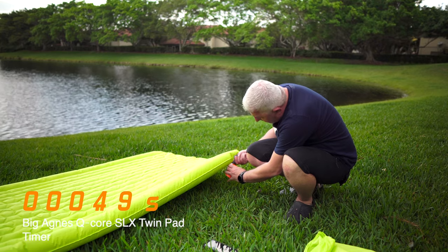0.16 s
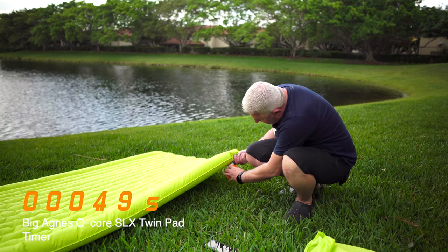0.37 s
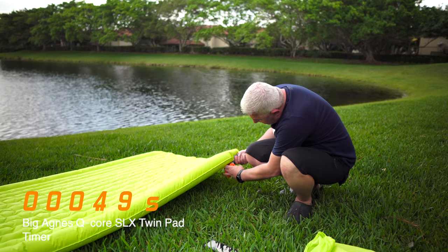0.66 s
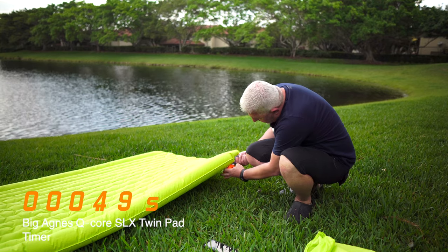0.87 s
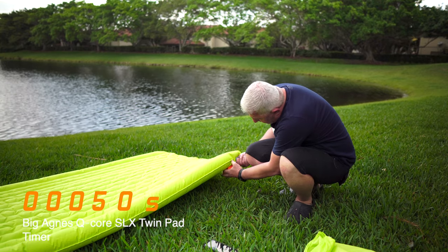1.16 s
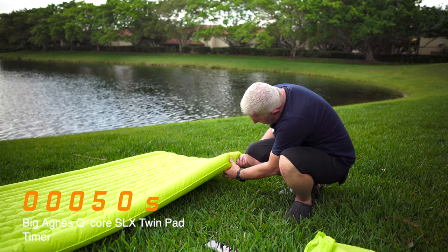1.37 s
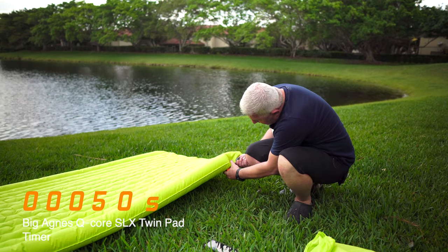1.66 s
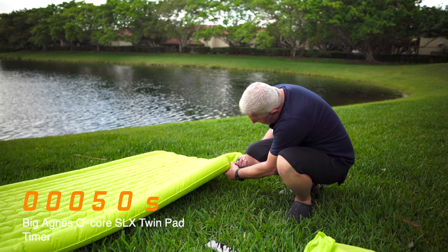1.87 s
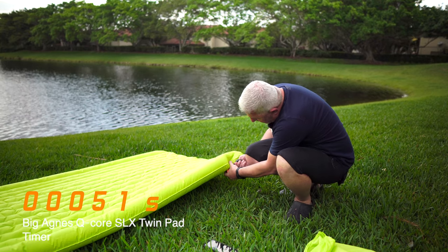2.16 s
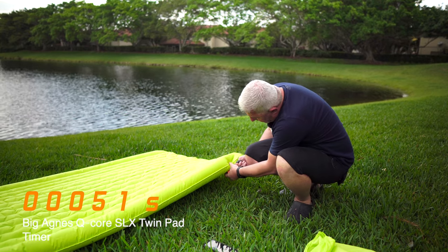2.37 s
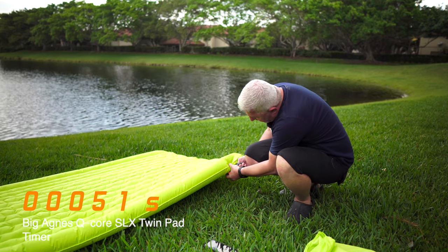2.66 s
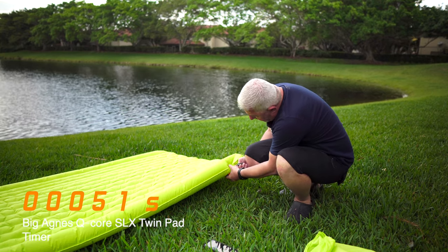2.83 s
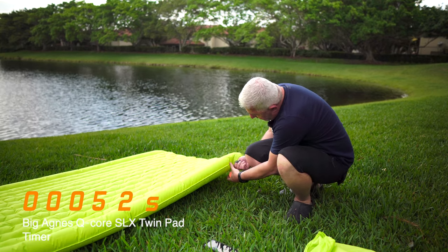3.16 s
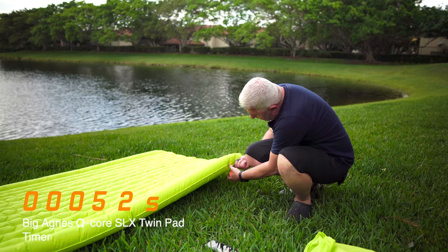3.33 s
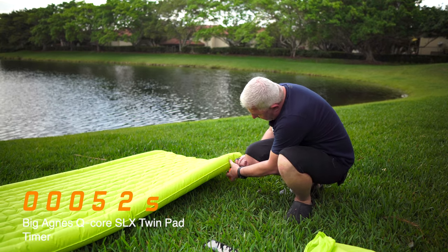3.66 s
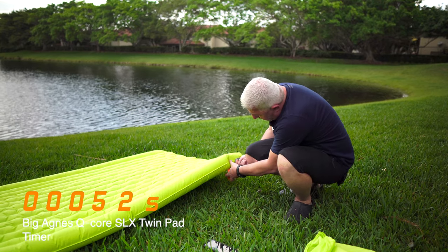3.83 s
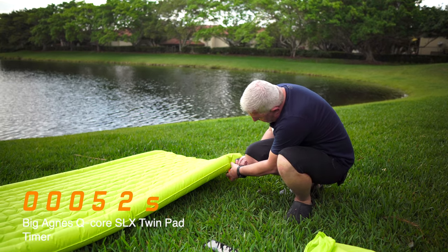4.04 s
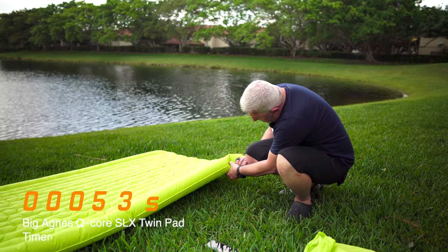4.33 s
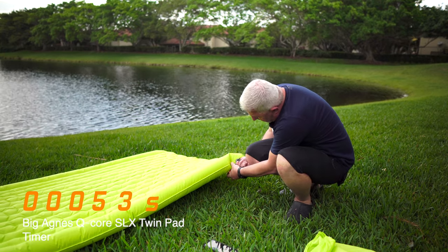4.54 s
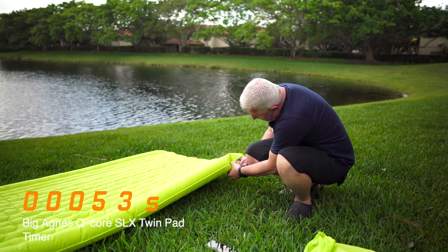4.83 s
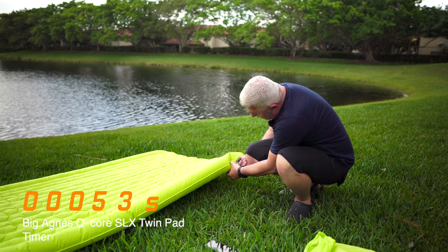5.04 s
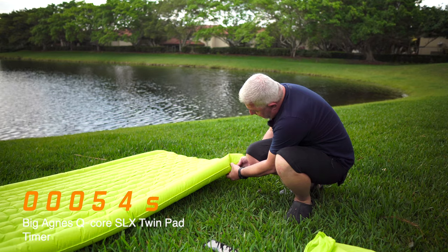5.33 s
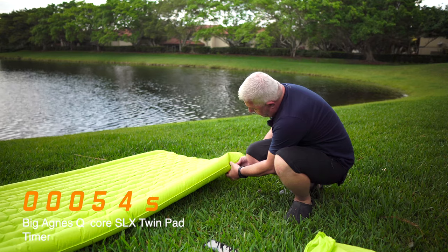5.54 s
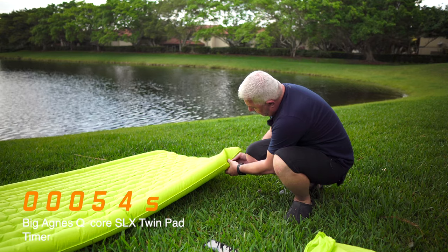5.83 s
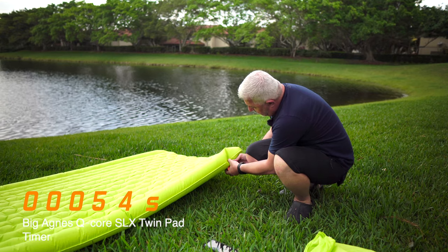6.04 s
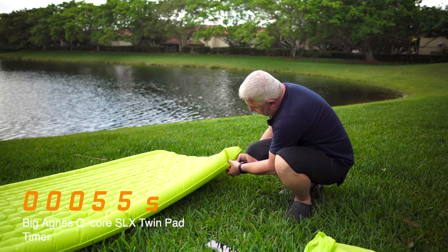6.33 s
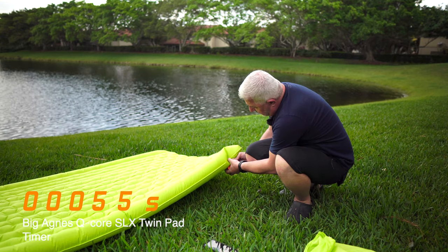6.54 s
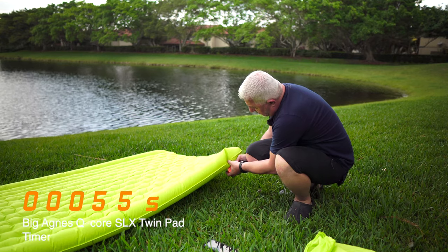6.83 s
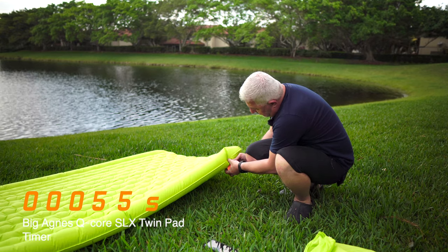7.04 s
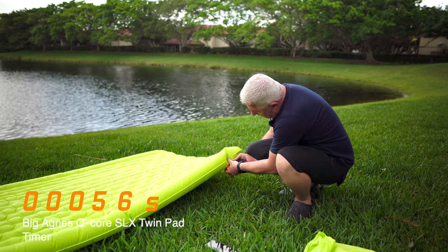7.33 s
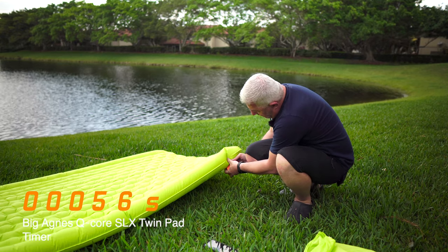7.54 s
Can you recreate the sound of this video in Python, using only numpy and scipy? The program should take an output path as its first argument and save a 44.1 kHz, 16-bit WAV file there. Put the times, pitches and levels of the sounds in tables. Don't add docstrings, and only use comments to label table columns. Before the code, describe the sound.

Close, high-pitched whine and rushing air of a handheld pump filling a mattress, its pitch wobbling, with handling clacks and late valve whistles.

```python
import sys
import numpy as np
from scipy import signal
from scipy.fft import rfft, irfft, next_fast_len
from scipy.io import wavfile
from scipy.ndimage import uniform_filter1d

SR = 44100
rng = np.random.default_rng(int(sys.argv[2]) if len(sys.argv) > 2 else 0)


def output_pcm(signal):
    pcm = np.clip(np.atleast_2d(signal).T, -1, 1) * 32767
    wavfile.write(sys.argv[1], SR, np.round(pcm).astype(np.int16))


def ratio(d):
    e = np.asarray(d, float) / 20
    return 10 ** e


N = 339129
T = np.arange(N) / SR
SLOW = T[::32]
HZ = np.fft.rfftfreq(next_fast_len(N), 1 / SR) + 1e-3
OCTAVE = np.log2(HZ)

# (time [s], wind and lawn level [dB], shaft unbalance level [dB])
LOW_LEVELS = [(0, -37.5, -39), (.55, -33.5, -38.5), (1.09, -36.5, -49), (1.3, -34.5, -48),
              (2.05, -38.5, -43), (2.33, -35, -53), (2.42, -36, -28.5), (2.8, -39, -37), (3.1, -38.5, -57),
              (4.2, -38, -38.5), (5.2, -38.5, -43.5), (5.5, -38.5, -74), (6.2, -36.5, -54),
              (7.05, -43.5, -76), (7.69, -40, -70)]


def columns(table, at=T):
    s, *curves = np.transpose(table)
    return [np.interp(at, s, curve) for curve in curves]


def unit(x):
    return x / np.sqrt(np.mean(x ** 2))


def fine(x):
    return np.interp(T, SLOW, x)


def walk(rate):
    hold = max(int(len(SLOW) / T[-1] / rate), 1)
    held = np.repeat(rng.standard_normal(1200), hold)[:len(SLOW)]
    slewed = uniform_filter1d(np.resize(held, len(SLOW)), hold)
    return unit(uniform_filter1d(slewed, hold))


def bump(s, rise, fall):
    away = (SLOW - s) / np.where(SLOW < s, rise, fall)
    return (1 + np.cos(np.pi * np.clip(away, -1, 1))) / 2


def gate(at, start, end, move_s):
    return np.clip(np.minimum(at - start, end - at) / move_s + 0.5, 0, 1)


def tone(hz):
    return 2 * np.pi * np.cumsum(hz) / SR


def colour(points):
    hz, db = np.transpose(points)
    return ratio(np.interp(np.log(HZ), np.log(hz), db))


def bands(gain, lo, hi, per_octave):
    size = next_fast_len(N)
    spectrum = rfft(rng.standard_normal(size)) * gain
    for hz in lo * 2 ** np.arange(0, np.log2(hi / lo), 1 / per_octave):
        away = np.clip((OCTAVE - np.log2(hz)) * per_octave, -1, 1)
        yield hz, irfft(spectrum * (1 + np.cos(away * np.pi)) / 2, size)[:N]


def blade_phase():
    # (time [s], frequency [Hz])
    blade_rate = [(0, 2954), (.955, 2961), (1.1, 3116), (2.31, 3109), (2.86, 3178), (3.25, 3190),
                  (3.33, 2960), (4.126, 3000), (4.33, 3104), (6.48, 3153), (6.56, 3390), (6.66, 3460),
                  (6.77, 3400), (6.89, 3280), (7.079, 3320), (7.259, 3423), (7.49, 3440), (7.66, 3480)]
    # (peak time [s], rise [s], fall [s], shift [Hz])
    pinches = [(.165, 0.15, 0.14, -17.5), (.46, .13, .11, -48.5), (1.03, 0.0602, .07, 25),
               (2.137, 0.17, 0.24, 134), (2.96, 0.14, .11, 182), (3.15, 0.084, 0.11, -13),
               (3.372, 0.037, 0.051, -28), (3.524, 0.096, 0.12, -42.5), (3.785, .17, 0.12, 155.5),
               (4.525, 0.16, 0.15, 135), (5.612, 0.16, 0.1, -79.5), (5.945, 0.13, 0.11, 133)]
    hz = columns(blade_rate, SLOW)[0]
    hz = hz + sum(shift * bump(s, rise, fall) for s, rise, fall, shift in pinches)
    hz = uniform_filter1d(hz, size=40)
    return tone(fine(hz * (1 + 0.00087 * walk(60))))


def blade_whine(phase):
    # (time [s], level [dB])
    grip = [(0, -22.5), (.3, -32), (.95, -31), (1.1, -31.5), (2.0, -31.5), (2.55, -32), (2.85, -48.5),
            (3.2, -46.5), (3.45, -34.5), (4.4, -35), (5.28, -36.5), (5.36, -22.5), (5.65, -23.5),
            (5.93, -31.5), (6.29, -24), (6.6, -38), (7.24, -35.5), (7.69, -33.5)]
    # (time [s], level [dB])
    intake_aim = [(0, -32), (.12, -17.5), (.36, -17.5), (.72, -27.5), (1.15, -33), (1.99, -34.5),
                  (2.59, -34), (2.87, -48), (3.23, -39), (3.3, -20.5), (3.6, -32.5), (4.39, -30.5),
                  (4.6, -36.5), (5.34, -34), (6.26, -31.5), (6.6, -38.5), (7.12, -39), (7.69, -46)]
    # level against the mean aim [dB], and share of the change of aim
    overtone_db, aim_share = [-0.5, -6.5, -21, -22.5], [1.0, 0.88, 0.32, 0.2]
    # (time [s], half length [s], gain [dB])
    shade_low = [(.41, .1, 7), (.485, 0.051, -13), (.78, 0.048, 6), (0.98, .03, -23), (2.162, 0.15, -8),
                 (2.895, .04, 10), (2.955, 0.054, 10), (3.271, 0.07, 20), (3.582, 0.14, -8),
                 (3.94, 0.044, -12), (4.146, 0.15, -3), (4.43, 0.025, -14), (4.49, 0.12, -5),
                 (4.572, 0.04, -16), (5.56, 0.021, -16), (6.675, 0.075, 6.5), (6.76, 0.037, 7),
                 (6.82, 0.05, -7), (7.515, 0.19, -6.5), (3.337, .05, 6)]
    # (time [s], half length [s], gain [dB])
    shade_mid = [(0.088, 0.043, -15), (0.49, 0.12, -13.5), (0.603, 0.26, 3), (0.883, 0.29, -9),
                 (2.13, 0.1, -27), (3.288, 0.018, -24), (3.47, 0.064, -14), (3.743, 0.13, -9),
                 (4.492, 0.087, -5), (5.204, 0.12, -3), (5.568, 0.092, -10), (5.976, 0.14, -6),
                 (6.122, 0.043, -12), (6.537, 0.049, -18), (0.796, 0.041, -18), (2.66, 0.22, 4),
                 (2.91, .07, -10), (3.0, 0.027, 8), (3.08, .06, -6), (3.612, 0.16, 4.5), (6.799, .05, -3),
                 (7.37, 0.047, -5)]
    # (time [s], half length [s], gain [dB])
    shade_high = [(0.165, 0.14, -19), (0.474, 0.18, -9), (0.927, .2, 8.5), (1.661, 0.6, 4),
                  (2.03, 0.044, -3), (6.852, 0.14, 4), (2.6, .25, -6), (3.006, 0.045, 14),
                  (3.305, 0.052, 12), (3.353, .035, -8), (3.4, .05, 11.5), (3.494, 0.071, -14),
                  (3.655, 0.13, 15.5), (3.878, 0.095, 14), (3.984, 0.16, -5), (4.485, 0.11, -18),
                  (5.072, 0.17, 7.5), (5.654, 0.43, -10), (6.26, 0.14, -15), (7.453, 0.68, -27),
                  (1.4, .06, 0), (3.122, .1, 5.5), (4.194, .06, 3), (5.6, .1, 5), (6.21, .06, 8),
                  (7.029, .2, 8)]
    # (time [s], half length [s], gain [dB])
    glints = [
        [(0, 0.18, 19), (.86, 0.21, 19), (1.45, .5, 8), (3.4, 0.22, 17), (3.64, 0.16, 19), (3.87, .06, 14),
         (4.07, 0.22, 16), (6.38, .2, 5), (.5, .14, 6), (2.15, .12, 8), (4.53, 0.097, 10), (5.6, .12, 10),
         (6.13, 0.16, 4), (6.62, .1, 12), (7.25, 0.16, 12)],
        [(.22, 0.28, 19), (.73, .07, 16), (.55, .15, 12), (5.3, .3, 5), (1.25, .5, 14), (1.9, .4, 12),
         (2.28, 0.055, 18), (2.55, .2, 8), (3.38, 0.17, 20), (3.75, 0.2, 14), (4.38, 0.12, 16),
         (4.76, 0.15, 15), (5.85, 0.059, 21), (6.2, .3, 3)],
    ]

    aim = columns(intake_aim, SLOW)[0]
    levels = columns(grip, SLOW)
    for db, share in zip(overtone_db, aim_share):
        levels.append(aim.mean() + db + share * (aim - aim.mean()))
    shades = [shade_low, shade_mid, shade_high] + glints
    whine = 0
    for order, (db, crossings) in enumerate(zip(levels, shades), start=1):
        db = db + sum(gain * bump(s, half, half) for s, half, gain in crossings)
        echo = abs(1 + 0.9 * np.exp(1j * order * 0.34 * walk(15)))
        level = fine(echo / 1.91 * ratio(db + 1.0 * walk(45)))
        whine = whine + level * np.sin(order * phase)
    return np.sqrt(2) * whine


def shaft_unbalance(phase):
    db = columns(LOW_LEVELS, SLOW)[1] - 3.0 + 1.7 * walk(11)
    return np.sqrt(2) * fine(ratio(db)) * np.sin(phase / 8)


def air():
    # (frequency [Hz], density [dB per Hz])
    air_colour = [(180, -44), (300, -27), (398, -11.5), (554, -10.5), (734, -3), (1250, -2.5), (1400, -3),
                  (1740, -1.5), (2190, -17.5), (2910, -23.5), (3160, -14), (3670, -14), (5830, -24.5),
                  (11100, -29.5), (15800, -31)]
    # (frequency [Hz], width [Hz], gain [dB])
    cavities = [(1255, 132, 4.5), (3800, 480, -3.5), (4910, 660, -2.5), (7900, 410, 2), (11240, 200, 5),
                (2620, 920, 2), (1900, 210, 4.5), (9300, 110, 7), (3400, 140, -2)]
    # (time [s], level [dB])
    flow = [(0, -27.5), (.15, -23), (1.95, -25.5), (2.07, -32), (2.23, -27.5), (2.65, -27.5), (2.83, -36),
            (3.0, -30.5), (3.22, -30.5), (3.3, -26), (3.63, -25), (3.71, -30), (4.04, -26), (4.32, -31),
            (5.26, -32.5), (5.36, -26.5), (6.45, -30.5), (7.69, -33.5)]
    # (time [s], level [dB])
    jet = [(0, -29.5), (.3, -34.5), (.41, -33), (.5, -33.5), (.62, -29.5), (.96, -30.5), (1.0, -40),
           (1.66, -36), (1.78, -36), (2.6, -37), (3.0, -46), (3.21, -45), (3.28, -38), (3.64, -36),
           (3.72, -35), (5.3, -37), (5.45, -39.5), (7.69, -46.5)]
    # (time [s], level [dB])
    leak = [(0, -48), (.12, -38.5), (.95, -41.5), (1.02, -43.5), (2.0, -49), (2.7, -50.5), (2.76, -60),
            (2.87, -65), (2.89, -44), (3.05, -49.5), (3.22, -40.5), (3.27, -43), (3.45, -35.5), (3.93, -52),
            (4.28, -54.5), (5.8, -48.5), (6.5, -49), (7.69, -44.5)]
    # (frequency [Hz], share of flow, share of jet, share of leak)
    air_zones = [(800, 0.6, 0.028, 0.0067), (1460, 1.13, 0.011, 0.029), (1670, 1.02, 0.086, .02),
                 (2490, 0.76, 0.073, 0.011), (3700, 0.078, 0.6, 0.21), (5100, 0.27, 1.19, 0.025),
                 (7060, 0.043, 0.083, 0.8), (10700, 0.23, 0.44, 0.13), (14200, 0.13, 0.49, 0.27)]
    # (start [s], end [s], frequency [Hz], gain [dB])
    palm_shifts = [(0.362, .46, 3700, 2), (0.445, 0.505, 1440, -9), (0.583, .72, 3800, 2.5),
                   (2.89, 3.082, 13500, 8), (.84, 0.95, 3700, 7.5), (1.15, 1.427, 10900, 6.5),
                   (1.72, 1.9, 5100, 5), (2.026, 2.27, 14200, 10), (2.302, 2.76, 800, 3.5),
                   (2.202, 3.099, 4450, 6), (3.272, 3.428, 7040, 7.5), (3.551, 3.928, 7300, 6),
                   (3.855, 4.195, 1130, -4.5), (4.426, 4.617, 9490, 4.5), (4.795, 5.302, 960, 3.5),
                   (5.103, 5.451, 2466, -5), (3.436, 3.752, 734, -13), (5.627, 5.989, 1994, -9.5),
                   (5.861, 6.046, 7120, 5), (5.819, 6.119, 12660, 2), (5.97, 6.093, 878, 4.5),
                   (6.094, 6.312, 1900, -1), (6.45, 6.675, 7470, 6), (6.5, 6.78, 1723, -4),
                   (6.78, 7.05, 11400, 9), (6.774, 7.014, 1380, 6.5), (6.79, 7.048, 4320, 7.5),
                   (6.998, 7.702, 1900, -6)]
    # (time [s], half length [s], gain [dB])
    surges = [(.16, 0.082, -2), (.395, 0.038, 3.5), (0.634, 0.042, 3.5), (0.724, 0.06, -2.5),
              (0.915, .05, 2.5), (1.08, 0.059, -1.5), (1.254, 0.068, 3.5), (1.385, 0.027, -3),
              (3.44, 0.026, -4.5), (3.578, 0.031, 3), (5.9, 0.057, -4), (6.133, 0.075, -2),
              (7.07, 0.11, -2), (7.466, .05, -2)]

    gain = colour(air_colour)
    for hz, width, db in cavities:
        gain = gain * ratio(db / (1 + ((HZ - hz) / width * 2) ** 2))
    drives = np.array(columns(flow, SLOW) + columns(jet, SLOW) + columns(leak, SLOW))
    drives = drives - drives.mean(axis=1, keepdims=True)
    zone_hz, *zone_shares = np.transpose(air_zones)
    palm = np.array([db * gate(SLOW, start, end, move_s=0.058) for start, end, _, db in palm_shifts])
    palm_hz = np.array(palm_shifts)[:, 2]
    surge = sum(db * bump(s, half, half) for s, half, db in surges)
    gust = 0.4 * walk(14) + 1.3 * walk(32)

    out = 0
    for hz, band in bands(gain, lo=420, hi=18000, per_octave=5):
        shares = [np.interp(np.log(hz), np.log(zone_hz), share) for share in zone_shares]
        db = np.array(shares) @ drives
        db = db + np.exp(-(np.log2(hz / palm_hz) / 0.25) ** 2) @ palm
        db = db + surge / (1 + (hz / 2270) ** 4)
        flicker = 1.0 * walk(4.7) + 0.5 * walk(22)
        out = out + fine(ratio(db + gust + flicker)) * band
    late = T - 0.00078 * fine(1 + 0.035 * walk(3))
    return ratio(-19) * unit(out + 0.19 * np.interp(late, T, out))


def shifting_bands(x):
    # (start [s], end [s], frequency [Hz], width [Hz], gain [dB])
    bands_swelling = [(0.0, 0.4, 13570.0, 900.0, 5.5), (0.0, 0.42, 4800, 500.0, 2.5),
                      (0.31, 0.45, 6680.0, 900.0, 6), (1.212, 2.009, 14250.0, 900.0, 4.0),
                      (1.953, 2.2, 4480.0, 500.0, 7), (1.97, 2.04, 690.0, 500.0, 4.5),
                      (2.07, 2.87, 2020.0, 260.0, 2), (2.12, 2.37, 9900, 899, 7), (2.57, 3.02, 4505, 500.0, 6.5),
                      (2.622, 3.423, 1900, 500.0, 2.5), (2.79, 3.04, 9130.0, 895, 7),
                      (3.003, 3.06, 650.0, 900.0, 6), (3.1, 3.55, 14690.0, 900.0, 4),
                      (3.102, 3.9, 4690.0, 500.0, 5.0), (3.75, 3.885, 1750, 900.0, 4),
                      (3.95, 4.402, 5670, 900.0, 5), (4.14, 4.59, 6890.0, 500.0, 8),
                      (4.835, 5.28, 1850, 900.0, 2), (4.838, 5.29, 9600.0, 900.0, 5),
                      (4.858, 5.316, 684, 900.0, 2.5), (5.03, 5.28, 4610.0, 900.0, 5),
                      (5.45, 5.59, 14000, 900.0, 7.5), (5.46, 6.26, 3000, 500.0, 7.5),
                      (6.007, 6.088, 1425, 260.0, 8.5), (6.35, 7.146, 2260, 259.7, 7.5),
                      (6.38, 6.63, 4570.0, 900.0, 5.5), (7.289, 7.7, 9000, 140.0, 5),
                      (7.54, 7.625, 1250.0, 900.0, 3.5)]
    # (start [s], end [s], frequency [Hz], width [Hz], gain [dB])
    bands_sinking = [(0.0, 0.22, 7020.0, 500.0, -3), (0.0, 0.396, 2120, 500.0, -5),
                     (0.0, 0.4, 9260.0, 260.0, -7), (0.178, 0.446, 690.0, 900.0, -4.5),
                     (0.4, 1.2, 11240.0, 500.0, -4.0), (0.647, 0.9, 1950, 500.0, -5),
                     (0.72, 0.97, 5730.0, 900.0, -7), (0.74, 1.19, 6590.0, 900.0, -10),
                     (0.96, 1.757, 7410.0, 500.0, -10), (1.05, 1.85, 3400, 260.0, -6),
                     (1.07, 1.87, 8530.0, 500.0, -5), (1.14, 1.59, 9900, 500.0, -8),
                     (1.25, 2.05, 6440, 900.0, -6), (2.21, 2.66, 5300.0, 500.0, -5.5),
                     (2.24, 3.04, 6290.0, 900.0, -6), (2.4, 3.2, 1410, 257, -4),
                     (2.43, 2.68, 8010.0, 500.0, -6.5), (2.97, 3.77, 2470, 500.0, -4.5),
                     (3.19, 3.99, 6460.0, 500.0, -8), (3.27, 3.41, 730.0, 260.0, -7),
                     (3.35, 3.8, 5560.0, 500.0, -6), (3.89, 4.141, 9260.0, 900.0, -8),
                     (4.29, 5.09, 8724, 500.0, -4), (4.293, 4.547, 1408, 500.0, -4.5),
                     (4.41, 4.86, 3270.0, 902, -2.5), (4.63, 5.433, 6230, 500.0, -4),
                     (4.69, 5.488, 13070, 900.0, -6), (5.25, 5.7, 5120.0, 500.0, -5.0),
                     (5.57, 6.37, 8570.0, 900.0, -5), (6.02, 6.815, 2010, 498, -5.5),
                     (6.5, 6.78, 5520, 1300, -4), (6.64, 6.89, 3570.0, 900.0, -2.5),
                     (6.66, 7.46, 10470.0, 500.0, -1)]
    # (start [s], end [s], frequency [Hz], width [Hz], gain [dB])
    throats = [(.37, .46, 3670, 400, 6.5), (0.6, 0.81, 3630, 330, 6.5), (0.81, 0.94, 3700, 300, 3),
               (.52, 0.91, 4960, 330, 4), (.7, .96, 8000, 400, 4), (3.97, 4.12, 3570, 400, 5.5),
               (4.6, 5, 1230, 140, 1), (6.18, 6.5, 1160, 180, 4), (2.3, 2.75, 11200, 150, 4)]
    hz, s, cells = signal.stft(x, SR, nperseg=1024, noverlap=768)
    events = np.transpose(bands_swelling + bands_sinking + throats)
    start, end, centre, width, db = events[:, :, None]
    shape = np.exp(-4 * np.log(2) * ((hz - centre) / width) ** 2)
    held = db * gate(s, start, end, move_s=0.035)
    return signal.istft(cells * ratio(shape.T @ held), SR, nperseg=1024, noverlap=768)[1][:N]


def whistle():
    # (time [s], frequency [Hz], level [dB])
    whistle_parts = [
        [(6.5, 1092, -28), (6.59, 1128, -22.5), (6.63, 1170, -24), (6.69, 1123, -20), (6.715, 1087, -32),
         (6.76, 1088, -36)],
        [(7.07, 1063, -27), (7.16, 1095, -34), (7.2, 1110, -22), (7.25, 1140, -21), (7.34, 1103, -24),
         (7.43, 1111, -28.5), (7.53, 1121, -20), (7.585, 1115, -23.5), (7.66, 1145, -20)],
    ]
    out = 0
    for part in whistle_parts:
        hz, db = columns(part, SLOW)
        start, end = part[0][0], part[-1][0] + 0.038
        fade = np.clip(np.minimum(SLOW - start, end - SLOW) / 0.011, 0, 1)
        phase = tone(fine(hz * (1 + 0.01016 * walk(90))))
        out = out + fine(fade * ratio(db + 0.71 * walk(50))) * np.sin(phase)
    return np.sqrt(2) * out


def around(s):
    return slice(int(s * SR) - 600, int(s * SR) + 3000)


def knocks():
    # (time [s], peak level [dB], frequency [Hz], rattle level [dB])
    knock_events = [(2.0281, -5, 380, -13.5), (2.0281, -6, 1000, -40), (2.8804, -11, 1050, -36),
                    (2.2277, -15.5, 290, -12), (2.6197, -20, 304, -13), (2.8816, 0.5, 293, -31),
                    (2.9765, -14, 398, -21.5), (2.98, -18.5, 378, -20), (2.9833, -16, 420, -34),
                    (3.256, -21.5, 295, -25), (3.463, -13.5, 601, -20), (3.9403, -13, 700, -20),
                    (4.4154, -8.5, 350, -24), (4.4151, -5.5, 820, -40), (4.4283, -14, 330, -26),
                    (4.591, -22, 450, -22), (4.5904, -4, 950, -26), (4.597, -17, 261, -22),
                    (5.8838, -21, 402, -39), (6.013, -6.5, 601, -10), (6.0156, -9, 427, -37),
                    (6.0182, -9, 448, -34), (6.455, -23, 297, -18), (6.4965, -2, 330, -18),
                    (6.4968, -11, 720, -40), (6.772, -25, 360, -14.5), (6.785, -22, 200, -33)]
    out = np.zeros(N)
    shell = signal.butter(2, [200, 1000], "band", fs=SR, output="sos")
    dull = unit(signal.sosfilt(shell, rng.standard_normal(N)))
    for s, db, hz, rattle_db in knock_events:
        near = around(s)
        t = T[near] - s
        push = -np.cos(2 * np.pi * hz * t) * np.exp(-(t * hz / np.where(t < 0, 0.48, 0.68)) ** 2)
        snap = t * hz - 0.22
        push += 0.13 * np.sin(2 * np.pi * 2.6 * snap) * np.exp(-(snap / 0.36) ** 2)
        push += 0.052 * (t > 0) * np.sin(2 * np.pi * 52 * t) * np.exp(-np.abs(t) / 0.012)
        rattle = (t > 0.7 / hz) * np.exp(-np.abs(t) / 0.0063) * dull[near]
        out[near] += ratio(db) * push + ratio(rattle_db) * rattle
    return out


def cracks():
    # (time [s], level [dB], frequency [Hz])
    crack_events = [(2.2, -17, 4100), (2.8, -10, 1250), (4.4152, -11.5, 4000), (6.0132, -12, 3700),
                    (6.0125, -11, 10900), (6.0136, -2, 1020), (6.0127, -13.5, 7200), (6.0146, -16, 9500),
                    (6.0126, -19, 8700), (6.0128, -21, 12700), (6.497, -23, 2380), (6.497, -32, 3300)]
    out = np.zeros(N)
    white = rng.standard_normal(N)
    for s, db, hz in crack_events:
        near = around(s)
        t = T[near] - s
        mode = signal.iirpeak(hz, 5.0, SR)
        bright = signal.lfilter(*mode, signal.lfilter(*mode, white[near]))
        decay = np.exp(-np.abs(t) / np.where(t < 0, 0.00025, 0.056 / np.sqrt(hz)))
        out[near] += ratio(db) * decay * (np.sin(2 * np.pi * hz * t) + 0.35 * unit(bright))
    return out


def lawn():
    # (frequency [Hz], density [dB per Hz])
    lawn_colour = [(12, -46), (20, -23.5), (107, -9), (198, -12.5), (398, -7), (544, -20.5), (700, -14),
                   (910, -30), (1540, -120)]
    low = 0
    for hz, band in bands(colour(lawn_colour), lo=23.2, hi=560, per_octave=2.06):
        low = low + fine(ratio(0.18 * walk(3.86) + 2.0 * walk(10))) * band
    hum = fine(ratio(-12 + 3.5 * walk(10))) * np.sin(tone(fine(119.5 + 5.0 * walk(16))))
    mains_db = -52 + 7 * bump(2.4, 0.35, 0.45) + 2.9 * walk(3.8)
    mains = fine(ratio(mains_db)) * np.sin(tone(fine(57 + 2.13 * walk(24))))
    return fine(ratio(columns(LOW_LEVELS, SLOW)[0])) * (unit(low) + hum) + mains


def scene():
    phase = blade_phase()
    pump = blade_whine(phase) + shaft_unbalance(phase) + shifting_bands(air()) + whistle()
    mono = pump + knocks() + cracks() + lawn()
    return np.array([mono, mono])


def roll_off(x):
    return signal.sosfilt(signal.butter(12, 15910, fs=SR, output="sos"), x)


def record(dry):
    low_pass = signal.ellip(14, 0.2, 80, 15750, fs=SR, output="sos")
    mix = np.clip(signal.sosfilt(low_pass, dry), -1, 1)
    return roll_off(mix)


dry = scene()
out = record(dry)
output_pcm(out)
```